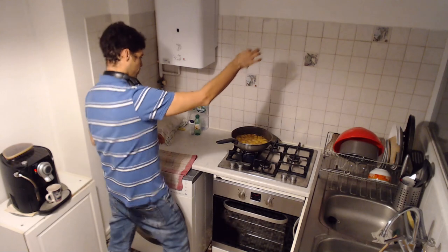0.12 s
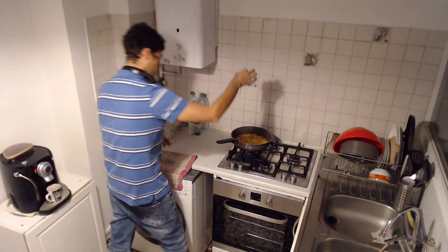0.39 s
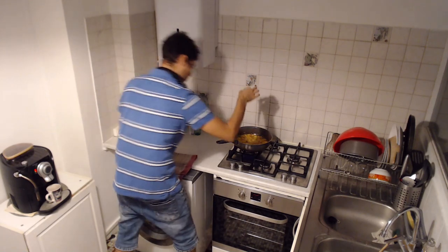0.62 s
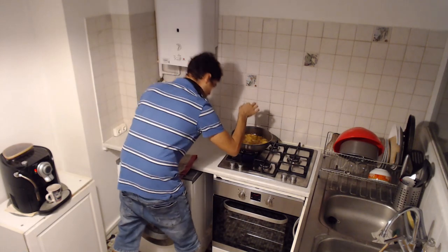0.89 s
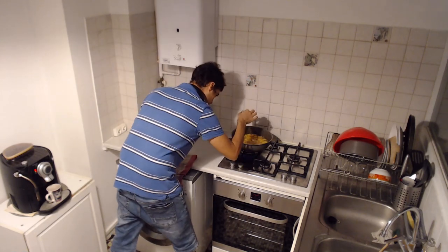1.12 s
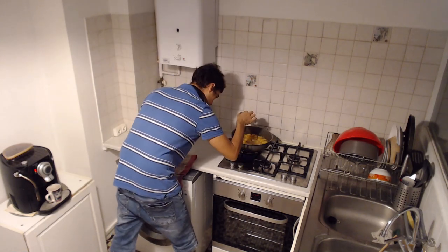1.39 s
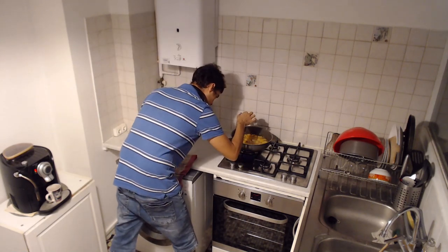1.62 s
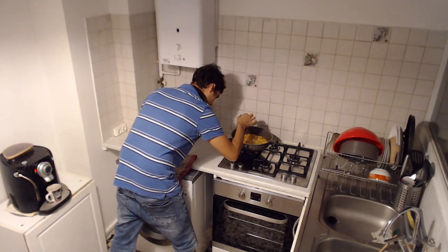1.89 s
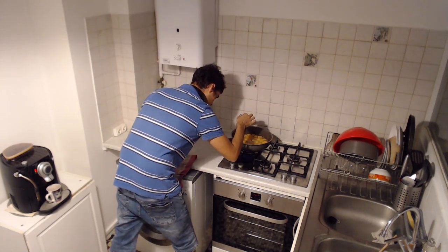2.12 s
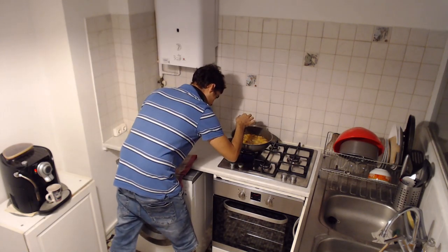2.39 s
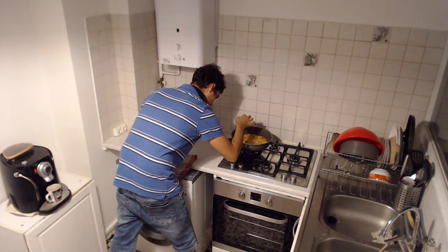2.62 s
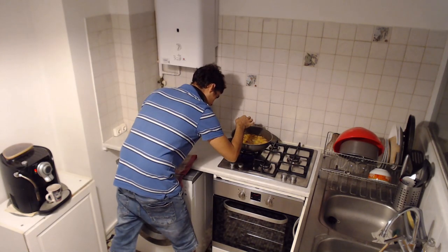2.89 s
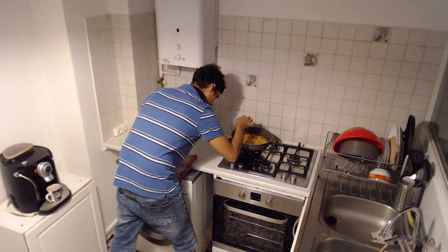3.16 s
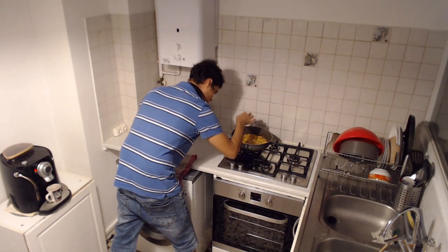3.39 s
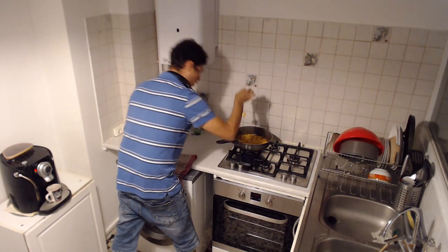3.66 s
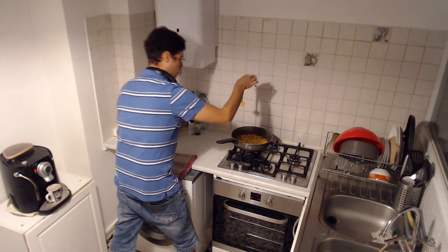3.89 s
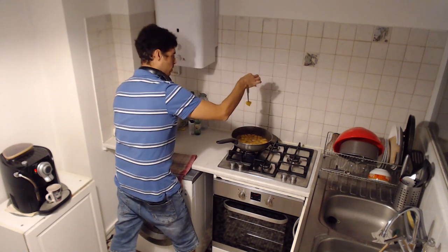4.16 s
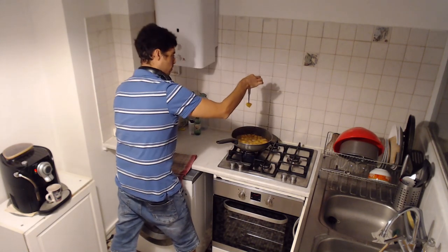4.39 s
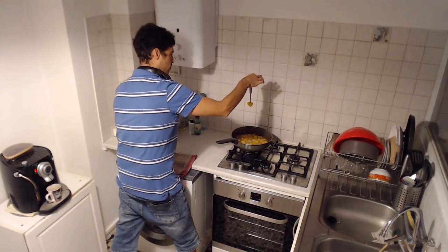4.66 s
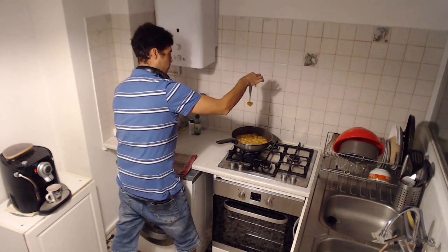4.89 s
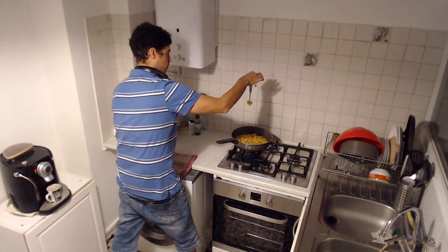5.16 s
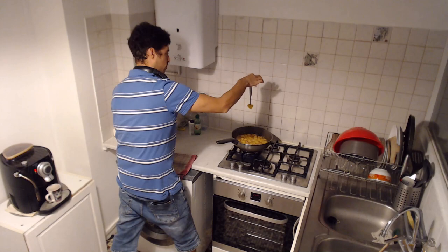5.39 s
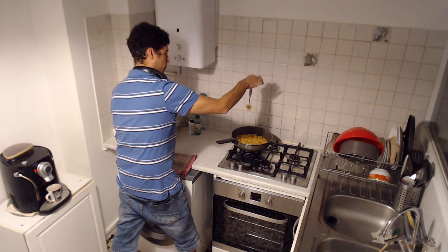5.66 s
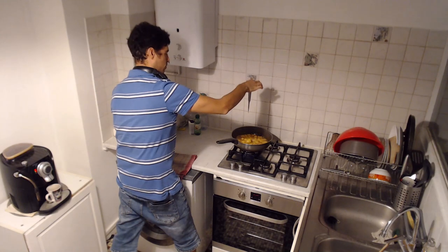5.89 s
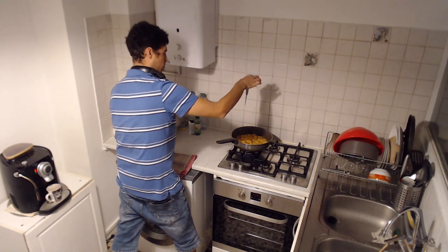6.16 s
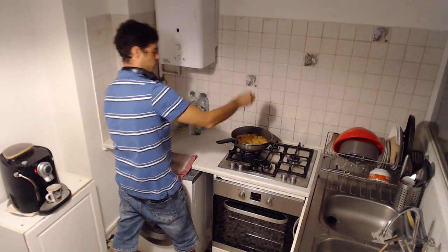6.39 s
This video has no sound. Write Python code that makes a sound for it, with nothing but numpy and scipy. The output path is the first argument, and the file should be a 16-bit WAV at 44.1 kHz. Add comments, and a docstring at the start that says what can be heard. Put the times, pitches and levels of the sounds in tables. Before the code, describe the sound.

Quiet, close simmering in a pan on a gas stove: dense bubbling, airy sizzle, irregular wet plops and dry cracks, low microphone bumps at first.

```python
"""Potatoes and bacon simmer in a frying pan on a gas stove in a small tiled kitchen.
Steam bubbles and spitting fat are short gliding tones, the fizz a dense crowd of finer ones;
the pan rings faintly in its modes, and steam jets, flame and room air are shaped noise.
Faint low tones swell and fade; a small microphone is moved about by hand and thumps now and then."""
import sys
import numpy as np
from scipy import signal
from scipy.io import wavfile
from scipy.ndimage import uniform_filter1d

SR = 44100
rng = np.random.default_rng(int(sys.argv[2]) if len(sys.argv) > 2 else 0)


def wav_record(signal):
    """Record a signal, one row per channel, as 16-bit PCM in the file named by sys.argv[1]."""
    frames = np.transpose(np.atleast_2d(signal))
    bounded = np.clip(frames, -1, 1)
    # unit amplitude maps onto the largest positive 16-bit level
    quanta = np.round(bounded * 32767).astype(np.int16)
    wavfile.write(sys.argv[1], SR, quanta)


def how_loud(loudness_db):
    """Turn decibels into a plain amplitude multiplier (0 dB gives 1, 20 dB gives 10)."""
    steps = np.asarray(loudness_db, float) / 20
    return 10 ** steps


N = 287973  # samples

# large steam bubbles bursting: start_s, level_db, pitch_hz
BUBBLES = [(0.394, -52, 1010), (.4635, -51, 955), (.519, -48.5, 755), (0.5777, -48, 1660), (.607, -57, 800),
           (.655, -57, 684), (.8032, -53, 780), (0.8453, -51.5, 1600), (0.877, -48.5, 1270),
           (0.894, -54, 1310), (1.0545, -47, 617), (1.072, -52, 1360), (1.299, -52, 1170),
           (1.349, -46, 557), (1.5534, -50, 626), (1.628, -54.5, 630), (1.747, -56, 1510),
           (1.842, -51, 600), (1.948, -53, 1100), (2.1731, -51, 540), (2.3503, -48.5, 1740),
           (2.365, -59, 1860), (2.4302, -49, 583), (2.461, -55, 830), (2.4845, -49, 650),
           (2.6294, -48.5, 795), (2.835, -44.5, 905), (2.883, -50.5, 845), (2.952, -50.5, 1450),
           (2.9683, -50, 620), (3.0337, -44, 660), (3.1039, -46, 1760), (3.119, -46, 1250),
           (3.2466, -48, 590), (3.269, -51, 1210), (3.308, -50.5, 700), (3.322, -55, 820),
           (3.316, -51.5, 574), (3.3352, -44, 660), (3.3465, -52, 807), (3.3827, -48.5, 1220),
           (3.4488, -44.5, 1190), (3.5827, -47, 1305), (3.7195, -49.5, 694), (3.7242, -51, 730),
           (3.753, -52, 1190), (3.767, -54, 1030), (3.848, -54, 626), (3.985, -53, 810), (4.258, -46, 1650),
           (4.541, -49.5, 1700), (4.5471, -51.5, 676), (4.562, -51.5, 1150), (4.706, -58, 1980),
           (4.715, -56, 1730), (4.751, -59, 1840), (4.779, -51, 1260), (4.904, -54.5, 1770),
           (4.975, -55.5, 710), (4.978, -52, 1760), (5.159, -52.5, 920), (5.2567, -51, 1200),
           (5.443, -51, 930), (5.445, -50.5, 1600), (5.454, -52, 980), (5.481, -56.5, 990),
           (5.555, -52, 1600), (5.616, -52, 1210), (5.66, -48, 1650), (5.8557, -53.5, 1210),
           (5.871, -47, 1180), (5.8782, -51, 664), (5.914, -54, 1250), (5.9661, -50, 720),
           (6.034, -54, 1330), (6.2183, -52.5, 1320), (6.2779, -49.5, 654), (6.385, -53.5, 695)]
# droplets of fat and water spitting: start_s, level_db, pitch_hz
SPITS = [(0.5883, -48, 6600), (0.6842, -52, 3080), (0.876, -51, 3150), (0.9868, -51, 3700),
         (1.057, -52.5, 3040), (1.221, -49, 6300), (1.2373, -43, 2990), (1.919, -46.5, 6560),
         (2.347, -50, 3070), (2.8042, -48.5, 3120), (2.906, -52, 2980), (3.3203, -50.5, 2900),
         (3.335, -47, 2840), (3.372, -47.5, 6511), (3.385, -46.5, 2860), (3.441, -47, 2580),
         (3.476, -53, 7350), (3.675, -48, 5700), (3.707, -60, 2390), (3.7262, -39, 2980),
         (3.754, -53, 2900), (3.845, -50, 7000), (4.273, -55, 5400), (4.3108, -48, 6440), (4.47, -48, 3400),
         (4.592, -46, 5760), (4.7175, -46.5, 2920), (4.919, -50, 3000), (5.063, -49.5, 2750),
         (5.1752, -48, 2800), (5.205, -50, 2340), (5.7364, -48, 4280), (5.855, -46.5, 3800),
         (5.8667, -46, 6070), (5.916, -56, 4000), (6.001, -55, 4000), (6.0107, -51, 4260),
         (6.0148, -48, 7100), (6.212, -49.5, 6060), (6.3909, -43, 6250), (6.406, -47, 6240)]
# dry, sharp cracks of hot fat: start_s, level_db
CRACKS = [(0.875, -39.5), (1.0563, -45.5), (1.2375, -54), (1.553, -48), (2.175, -44), (2.63, -42),
          (3.7252, -39), (4.259, -50), (4.7785, -44), (5.176, -48), (5.8525, -46), (5.858, -53),
          (5.914, -51), (6.2782, -52)]
# short jets of steam: peak_s, level_db (rms before rise and fade), centre_hz, width_hz (each pass), rise_s
JETS = [(0.581, -62, 1530, 885, 0.0032), (3.476, -52, 7150, 1110, 0.016), (5.178, -60, 2440, 1880, 0.012),
        (5.857, -53.5, 4500, 6200, 0.0099), (6.391, -56.5, 6000, 2650, 0.0027)]
# shifts of the hand on the microphone: centre_s, level_db, pitch_hz, push (signed factor; negative is a pull)
THUMPS = [(0.205, -43, 69, 0.74), (0.223, -46, 85, 0.96), (0.2363, -40.5, 90, 1), (.251, -53, 90, -1.2),
          (0.317, -44, 77.4, -0.86), (0.35, -56, 73, 0.86), (0.397, -48.5, 111, 0.73),
          (0.427, -47, 54.4, -1.6), (0.472, -41.5, 71.4, 0.82), (3.757, -45, 36.8, 0.43),
          (5.296, -49, 74, 0.78), (5.462, -45, 60.6, -0.58), (5.786, -45, 58, 0.012),
          (5.838, -52, 40.6, -1.1)]
# vigour of the simmer: time_s, vigour_db (above its usual level)
VIGOUR = [(0, 3.5), (.3, 0), (.6, 1.5), (1.0, -0.5), (2.15, -0.84), (2.45, -0.4), (2.751, 0), (3.253, -2),
          (3.5, 2), (4.1, 0), (4.65, 0), (4.95, 1.3), (5.25, -0.5), (5.8, -1.5), (6.1, 0), (6.53, 3)]
# relative strength of small bubbles by pitch: pitch_hz, grain_db
BUBBLING = [(250, -2.5), (400, -6), (600, 5.5), (900, 1), (1300, 4.5), (1900, 0), (2600, -18.5)]
# relative strength of fizzing fat by pitch: pitch_hz, grain_db
FIZZ = [(1500, -20.5), (2200, -10), (3000, -5), (4000, -5), (5500, -1.5), (7000, 2.5), (8000, -7.5)]
# relative strength of short wet pops by pitch: pitch_hz, grain_db
SPUTTER = [(450, -6.5), (900, 0), (1800, -1.5), (3000, -5)]
# spectrum shape of flame, steam and room air: frequency_hz, density_db (relative, per Hz)
AIR = [(15, 11.5), (30, -1), (60, 4), (100, -6), (140, -1.5), (190, -10.5), (300, -21.5), (420, -31),
       (600, -11.5), (1300, -6.5), (2200, -17), (3000, -15.5), (5000, -18.5), (7000, -17.5)]
# modes of the pan: mode_hz, gain_db (before a common factor of 10), t60_s
PAN = [(225, -15, 0.69), (690.5, -22, 0.64), (1060.6, -17, 0.35), (2990, -19.5, 0.37)]
# faint wavering tones: pitch_hz, level_db (rms), width_hz
HUMS = [(100, -74, 6.8), (500, -78.5, 1.5), (1881, -81, 1.0)]
# reverberation of the kitchen: frequency_hz, t60_s
KITCHEN = [(200, 0.67), (1000, 0.14), (4000, 0.094), (8000, 0.16)]
# low tones that swell and fade: start_s, end_s, pitch_hz, level_db (of the clean peak and the fuzz rms)
MOANS = [(0.549, 1.134, 222.6, -68), (.7, 1.56, 497, -72), (.85, 1.916, 140.6, -73.5),
         (3.503, 3.834, 225, -69), (4.804, 6.19, 99.8, -73), (5.267, 5.328, 225, -61.5)]

# levels in dB, rms before stirring and vigour
BUBBLING_DB, SPUTTER_DB, FIZZ_DB, CRACKLE_DB = -65, -69.5, -67.5, -76.5
FIZZ_FOLLOWS = 1.35  # dB of fizz and crackle per dB of vigour
BUBBLE_CYCLES, BUBBLE_POWER = 2.97, 1  # cycles at 1 kHz; higher bubbles ring for more cycles
SPIT_CYCLES, SPIT_POWER = 5.3, 0.31  # cycles at 6.5 kHz; higher droplets ring for more cycles
CRACK_HZ, CRACK_CYCLES = 1600, 1
# the tick lies about an octave above the ring; in large bubbles SNAP_DB is relative to the ring
SNAP_RATIO, SNAP_CYCLES, SNAP_LAG_S, SNAP_DB = 1.91, 2.2, 0.00064, -7.5
AIR_DB = -60.5  # rms
THUMP_CYCLES = 0.58  # sets the width of the thump's envelope
RUMBLE_DB, RUMBLE_HZ, RUMBLE_WIDTH_HZ = -67, 90, 170  # grip noise, level before stirring
JET_FADE_S = 0.15  # time to die by 60 dB
OFFSET = .0259  # the converter's constant offset, full scale = 1


def evened(x):
    """Normalisation by mean power: scales to rms 1."""
    return x / np.sqrt(np.mean(x ** 2) + 1e-20)


def read(points, hz):
    """Interpolation of a spectrum on a logarithmic frequency axis."""
    f, value = np.transpose(points)
    return np.interp(np.log(hz + 1), np.log(f + 1), value)


def add(mix, s, sound):
    """Superposition: mixes a sound in at time s, in place."""
    part = mix[round(s * SR):][:len(sound)]
    part += sound[:len(part)]


def resonate(x, hz, width):
    """Resonance of unit gain by heterodyning: shifts hz down to zero, smooths, shifts back."""
    turn = np.exp(2j * np.pi * np.cumsum(hz * np.ones(len(x))) / SR)
    r = np.exp(-np.pi * width / SR)
    return 2 * (turn * signal.lfilter([1 - r], [1, -r], x / turn)).real


def blip(hz, cycles, glide):
    """Bubble resonance: a gas pocket rings briefly, its pitch rising as it opens to the surface."""
    samples = int(3 * cycles / hz * SR) + 2
    u = np.arange(samples) / SR * hz / cycles
    swell = np.e * u * np.exp(1 - np.e * u)
    return swell * np.sin(2 * np.pi * cycles * u * (1 + glide * (u - .5)))


def grains(spectrum, per_s, cycles, spread_db, glide, clumping, tick=0, count=40):
    """Clustered random process: pockets of all sizes burst at random; a few are strong."""
    out = np.zeros(N)
    drift = uniform_filter1d(rng.standard_normal(N), 400)
    clumps = evened(uniform_filter1d(drift, 400))
    chance = per_s / count / SR * np.exp(clumping * clumps)
    for hz in np.geomspace(spectrum[0][0], spectrum[-1][0], count):
        size = how_loud(spread_db * np.minimum(rng.exponential(1, N), 3))
        bursts = size * (rng.random(N) < chance)
        pocket = blip(hz, cycles, glide)
        add(pocket, 0, tick * blip(SNAP_RATIO * hz, cycles, glide))
        out += signal.oaconvolve(bursts, how_loud(read(spectrum, hz)) * pocket)[:N]
    return evened(out)


def churn(bursts, stir_db, settle_s):
    """Stirring and relaxation: a gain that rises after each listed event and settles to 1."""
    stir, u = np.zeros(N), np.arange(SR // 4) / SR / settle_s
    for s, db, *_ in bursts:
        add(stir, s, how_loud(db + stir_db) * u * np.exp(1 - u))
    return np.sqrt(1 + stir ** 2)


def simmer():
    """Nucleate boiling: small bubbles, wet pops, fizz and dry crackle follow the vigour of the boil."""
    vigour_db = np.interp(np.arange(N) / SR, *np.transpose(VIGOUR))
    # large bursts stir the liquid, and small ones sputter on after them
    bubbling = churn(BUBBLES, 41.5, 0.0084) * grains(BUBBLING, 700, 2.74, 2.6, 0.15, .55, tick=0.54)
    fizz = churn(SPITS, 30.0, 0.056) * grains(FIZZ, 3200, 9.06, 1.0, 0.082, 0.61)
    sputter = churn(BUBBLES, 46.7, 0.036) * grains(SPUTTER, 230, 1.19, 3.0, 0.034, .7, count=16)
    crackle = grains(FIZZ, 210, 9.3, 2.2, 0.023, 0.55, count=24)
    wet = how_loud(BUBBLING_DB) * bubbling + how_loud(SPUTTER_DB) * sputter
    treble = how_loud(FIZZ_DB) * fizz + how_loud(CRACKLE_DB) * crackle
    return how_loud(vigour_db) * wet + how_loud(FIZZ_FOLLOWS * vigour_db) * treble


def pan(x):
    """Modal vibration: every burst shakes the pan, which rings on in its modes."""
    return sum(how_loud(db) * resonate(x, hz, 4.2 / t60) * 10 for hz, db, t60 in PAN)


def kitchen(x):
    """Reverberation: sparse tile reflections, each band dying at its own speed; three paths take turns."""
    out = np.zeros(N)
    for path in range(3):
        taps = np.zeros(SR // 2)
        at = np.arange(200, len(taps) - 20, 20)
        taps[at + rng.integers(0, 20, len(at))] = rng.choice([-1., 1.], len(at))
        hz, t, z = signal.stft(taps, SR, nperseg=256)
        decay = how_loud(-60 * t / read(KITCHEN, hz)[:, None])
        tail = signal.istft(z * decay, SR, nperseg=256)[1]
        # the squares of the three shares always sum to 1
        share = np.sqrt(2 / 3) * np.cos(np.pi * (3 * np.arange(N) / SR + path / 3))
        out += signal.fftconvolve(x * share, tail / np.linalg.norm(tail))[:N]
    return out


def air():
    """Broadband turbulence: steady noise of flame and room with drifting patches, and faint hums."""
    frames, hz = N // 512 + 5, np.fft.rfftfreq(2048, 1 / SR)
    a, b, patches = rng.standard_normal((frames, 1025, 3)).T
    patches = uniform_filter1d(uniform_filter1d(patches, 40, 0), 3, 1)
    patch_db = 3.1 * np.minimum(0.48 + hz / 2500, 1)[:, None] * evened(patches)
    z = (a + 1j * b) * how_loud(read(AIR, hz)[:, None] + patch_db)
    noise = signal.istft(z, nperseg=2048, noverlap=1536)[1][:N]
    hums = sum(how_loud(db) * evened(resonate(rng.standard_normal(N), f, w)) for f, db, w in HUMS)
    return how_loud(AIR_DB) * evened(noise) + hums


def thumps():
    """Handling noise: each grip shift pushes or pulls the capsule for about one cycle, leaving a rumble."""
    out, t = np.zeros(N), np.arange(N) / SR
    for s, db, hz, push in THUMPS:
        envelope = np.exp(-np.e * ((t - s) * hz / THUMP_CYCLES) ** 2)
        out += push * how_loud(db) * envelope * np.sin(2 * np.pi * hz * (s - t))
    rumble = evened(resonate(rng.standard_normal(N), RUMBLE_HZ, RUMBLE_WIDTH_HZ))
    return out + how_loud(RUMBLE_DB) * (churn(THUMPS, 51.0, 0.011) - 1) * rumble


def pops():
    """Damped free oscillation: large bubbles, spits and cracks, each a short ring."""
    out = np.zeros(N)
    for s, db, hz in BUBBLES:
        cycles = BUBBLE_CYCLES * (hz / 1e3) ** BUBBLE_POWER
        add(out, s, how_loud(db) * blip(hz, cycles, 0.02))
        # the skin tears with a tick
        add(out, s + SNAP_LAG_S, how_loud(db + SNAP_DB) * blip(SNAP_RATIO * hz, SNAP_CYCLES, 0.066))
    for s, db, hz in SPITS:
        cycles = SPIT_CYCLES * (hz / 6500.0) ** SPIT_POWER
        add(out, s, how_loud(db) * blip(hz, cycles, 0.0077))
    for s, db in CRACKS:
        add(out, s, how_loud(db) * blip(CRACK_HZ, CRACK_CYCLES, 0.017))
    return out


def moans():
    """Narrowband tones: a sine and a narrow band of noise at one pitch swell and fade together."""
    out = np.zeros(N)
    for start, end, hz, db in MOANS:
        t = np.arange(0, end - start, 1 / SR)
        clean = np.sin(2 * np.pi * (hz * t + rng.random()))
        fuzz = evened(resonate(rng.standard_normal(len(t)), hz, 35))
        add(out, start, how_loud(db) * (clean + fuzz) * signal.windows.tukey(len(t), .6))
    return out


def jets():
    """Jet noise: steam squeezes out from under the food as short bands of gritty hiss."""
    out, t = np.zeros(N), np.arange(-SR // 20, SR // 4) / SR
    fade = how_loud(-60 * np.maximum(t, 0) / JET_FADE_S)
    for s, db, hz, width, rise in JETS:
        droplets = rng.standard_normal(len(t)) * how_loud(1.8 * rng.exponential(1, len(t)))
        jet = evened(resonate(resonate(droplets, hz, width), hz, width))
        add(out, s + t[0], how_loud(db) * fade * np.clip(1 + t / rise, 0, 1) * jet)
    return out


def scene():
    """Direct and reflected sound: food and pan excite the kitchen; air and handling reach the capsule directly."""
    small, large = simmer() + jets(), pops()
    food = small + large + pan(small + large)
    # large bursts throw more sound up out of the pan
    echoes = kitchen(how_loud(-9.0) * food + how_loud(-9.0) * large)
    return (food + echoes + air() + moans() + thumps())[None]


def low_pass(x):
    """Removes everything above the highest recorded frequency."""
    return signal.sosfilt(signal.butter(12, 8490, fs=SR, output="sos"), x)


def record(dry):
    """Band limitation: a converter with a steep low-pass and a constant offset."""
    lowpass = signal.firwin(101, 7750, window=("kaiser", 6), fs=SR)
    limited = signal.oaconvolve(dry, lowpass[None], "same")
    return low_pass(limited + OFFSET)


dry = scene()
out = record(dry)
wav_record(out)
```